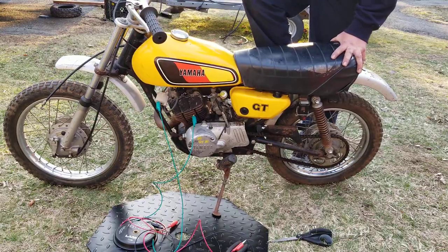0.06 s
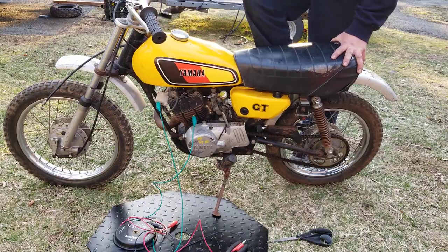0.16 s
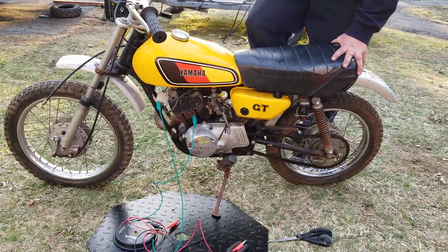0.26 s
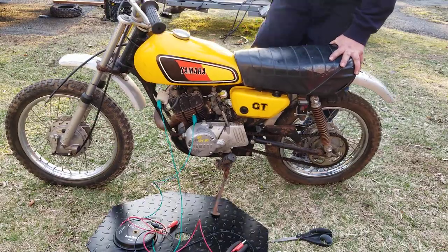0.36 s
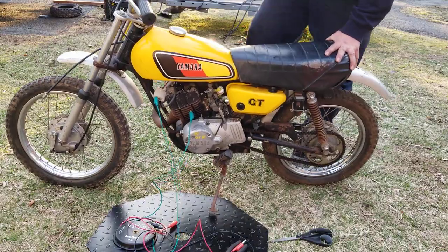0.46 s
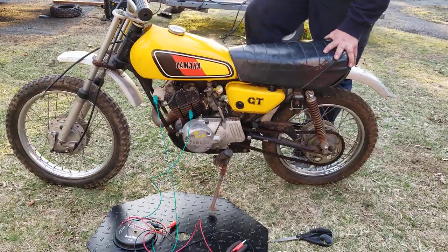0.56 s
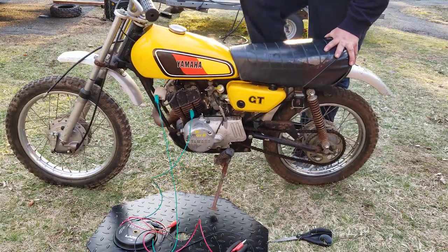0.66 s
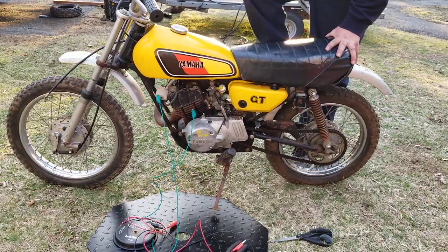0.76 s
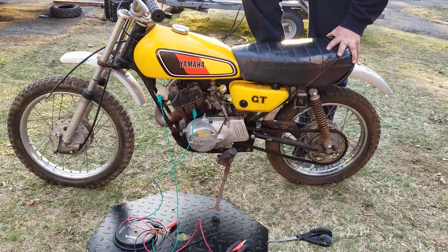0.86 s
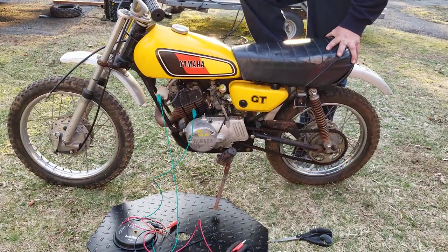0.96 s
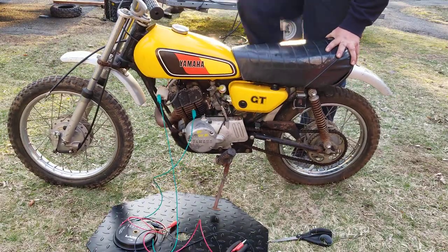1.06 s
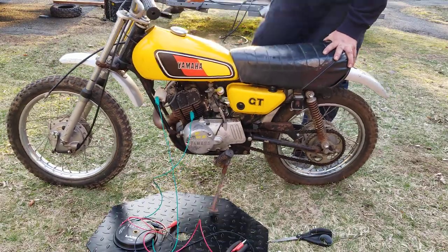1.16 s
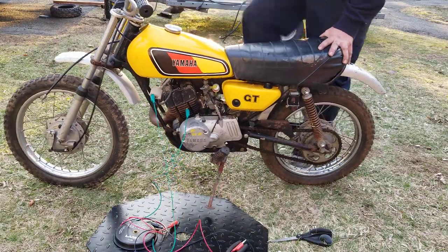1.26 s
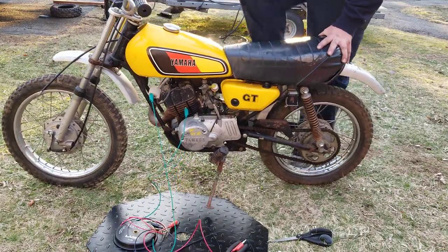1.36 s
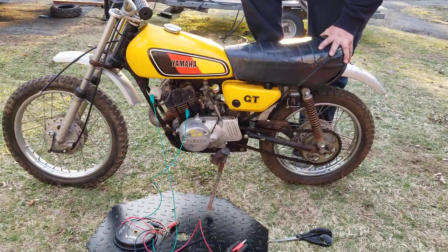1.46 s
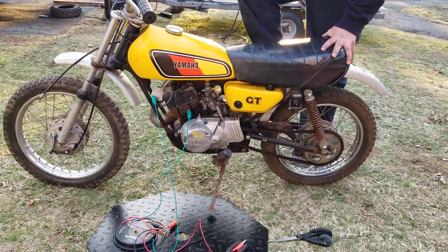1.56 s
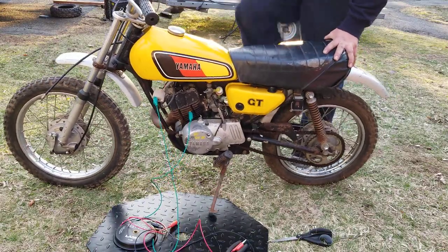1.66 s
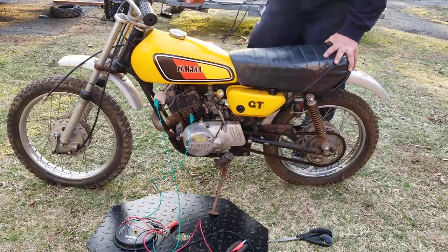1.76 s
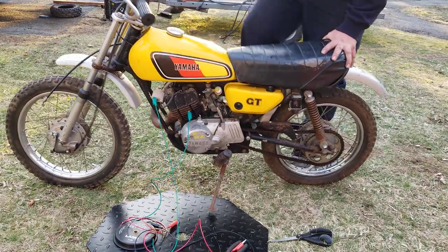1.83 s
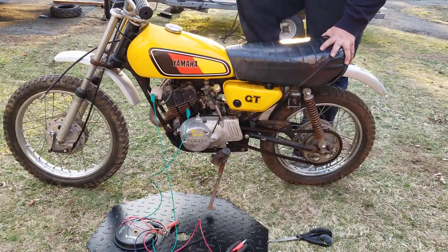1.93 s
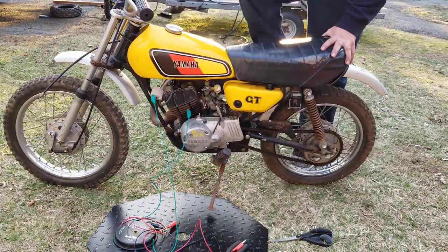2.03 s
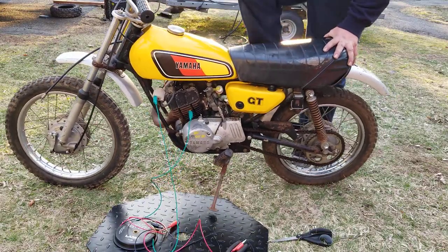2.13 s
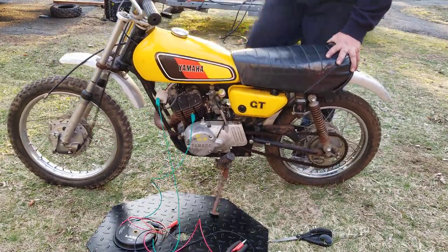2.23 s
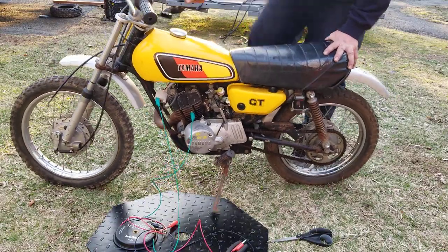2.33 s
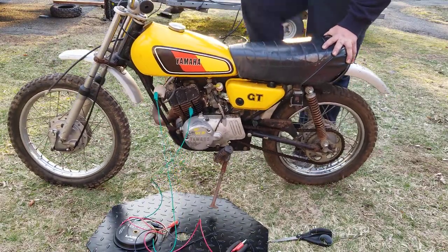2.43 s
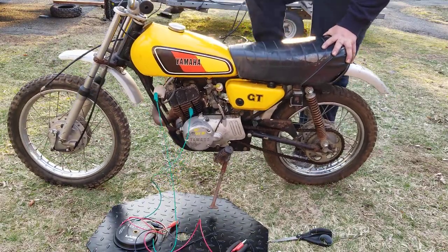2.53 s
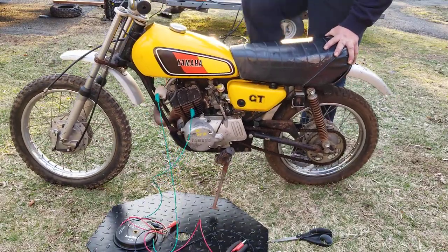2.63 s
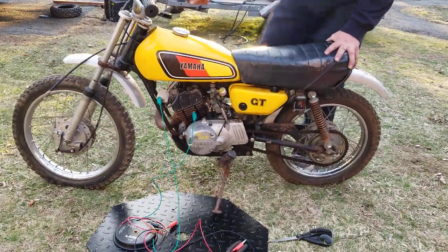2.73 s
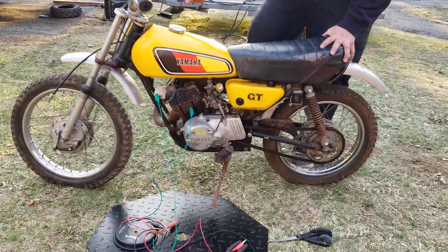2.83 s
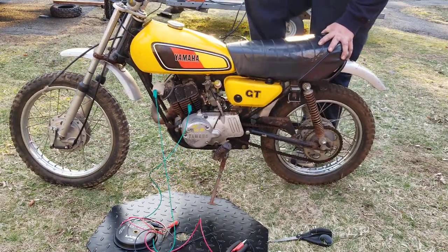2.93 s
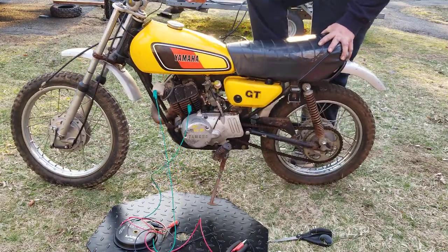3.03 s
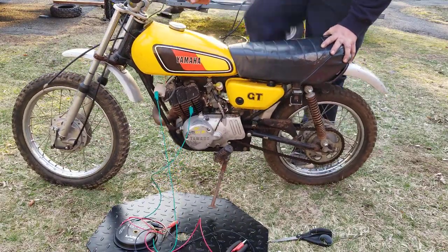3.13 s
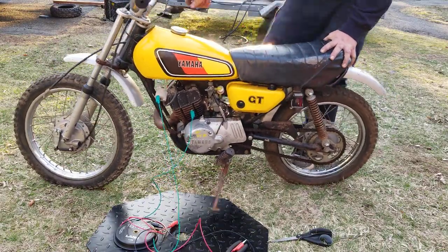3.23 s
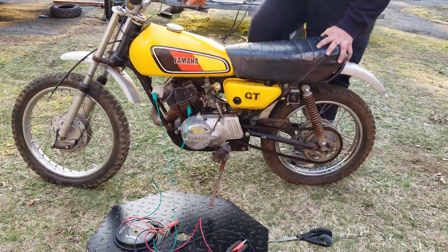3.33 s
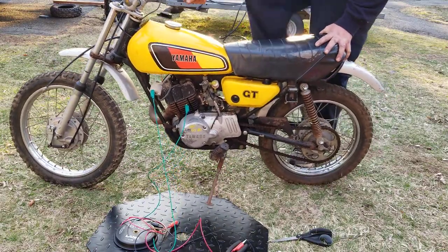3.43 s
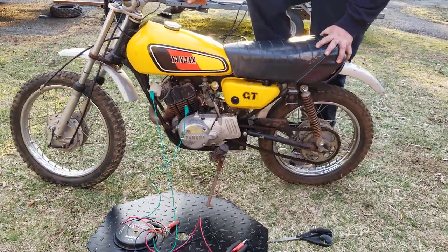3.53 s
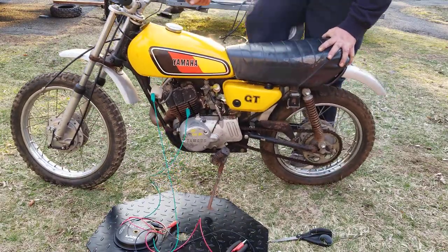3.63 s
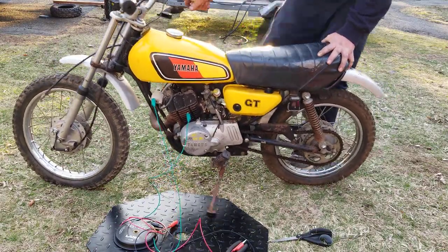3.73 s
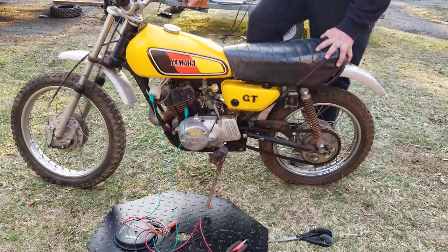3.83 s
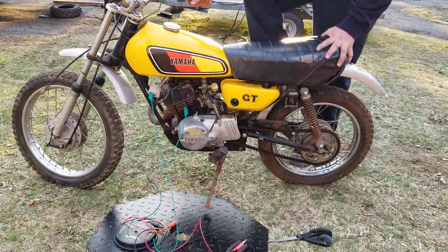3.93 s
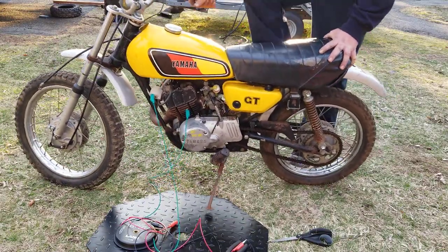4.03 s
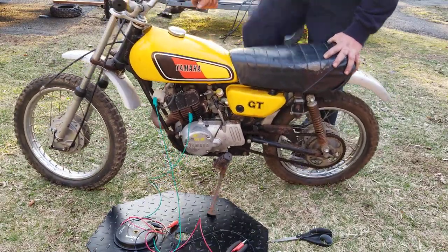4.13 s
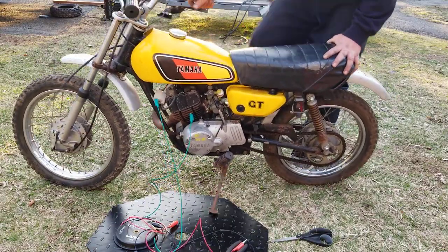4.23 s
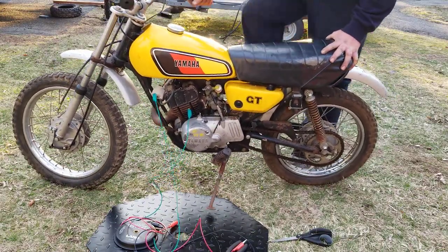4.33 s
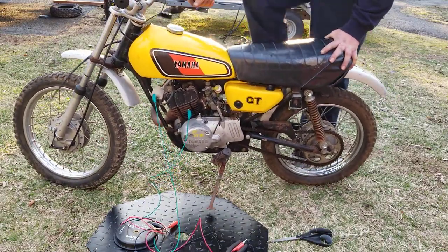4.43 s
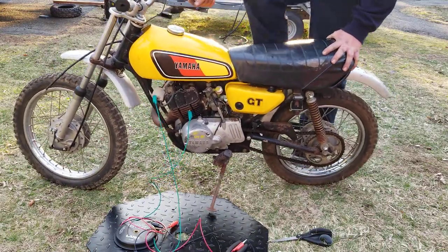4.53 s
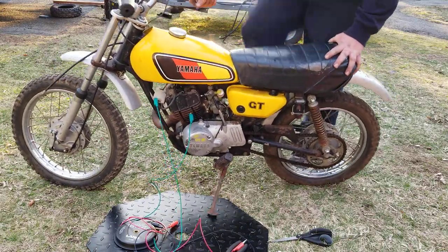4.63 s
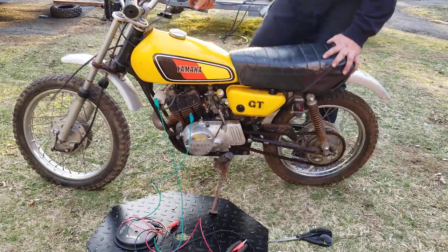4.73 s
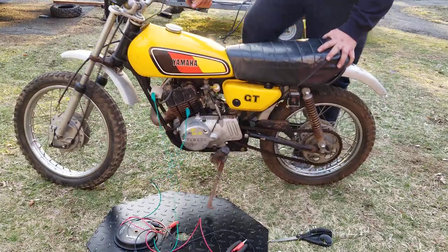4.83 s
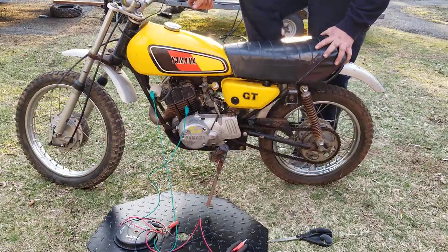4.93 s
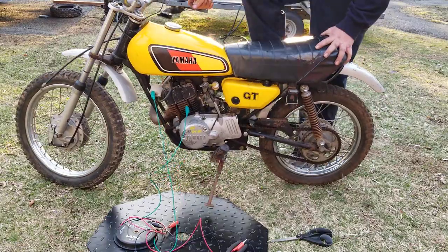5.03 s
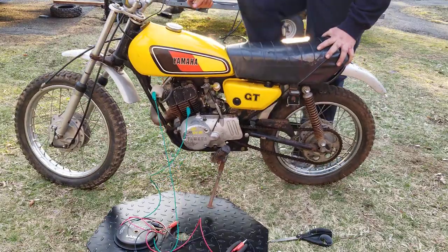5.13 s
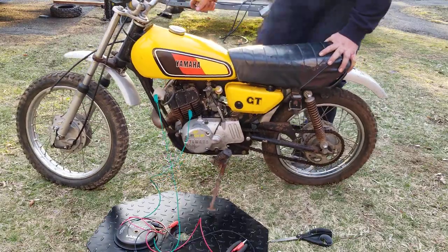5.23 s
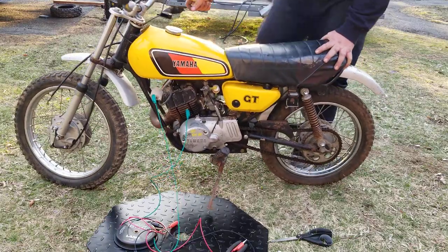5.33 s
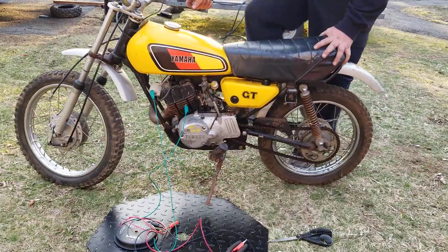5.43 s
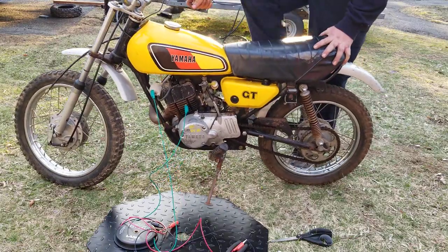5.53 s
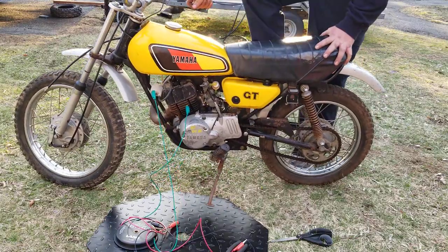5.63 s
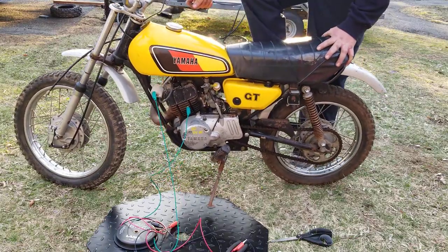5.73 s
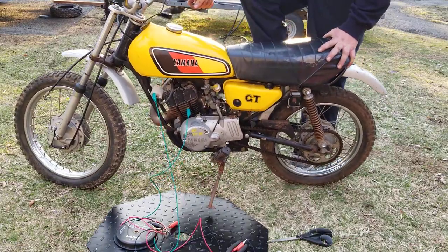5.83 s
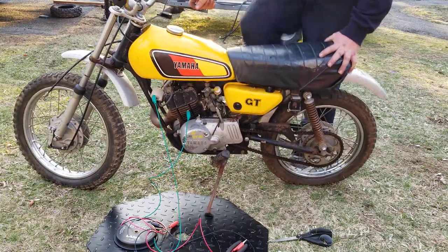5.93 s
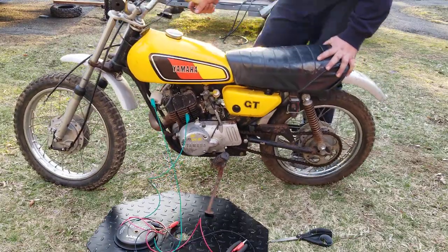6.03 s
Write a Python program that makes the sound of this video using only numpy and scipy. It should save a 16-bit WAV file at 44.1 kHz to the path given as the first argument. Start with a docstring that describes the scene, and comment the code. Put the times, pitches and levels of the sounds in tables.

```python
"""A small two-stroke motorbike is kicked over eleven times on a lawn and never fires.
Light wind and far traffic, as shaped noise, lie under it all; faint rustles and one soft tone fall in places.
In a typical kick the pawl clicks in and jolts the frame, exciting their modes, and the gears whirr.
Air squeezed out at compressions hisses as band-shaped noise; the pipe toots, its modes damped at port closing.
Then the lever clanks on its stop and ticks back, as short noise blows filtered by the modes of the case."""
import sys
import numpy as np
from scipy import signal
from scipy.fft import rfft, irfft, next_fast_len
from scipy.io import wavfile
from scipy.ndimage import uniform_filter1d

SR = 44100
rng = np.random.default_rng(int(sys.argv[2]) if len(sys.argv) > 2 else 0)


def generate_wav(signal):
    """Clip the signal to [-1, 1] and save it as 16-bit WAV at the path in sys.argv[1]."""
    frames = np.transpose(np.atleast_2d(signal))
    scaled = np.clip(frames, -1, 1) * 32767
    pcm = np.round(scaled).astype(np.int16)
    wavfile.write(sys.argv[1], SR, pcm)


N = 268569


def amp(db):
    """Level to amplitude: 20 dB for each factor of ten."""
    return 10 ** (np.asarray(db) / 20)


def evened(x):
    """Normalisation to unit root-mean-square value."""
    return x / np.sqrt(np.mean(x ** 2) + 1e-20)


def smoothed_twice(x, width):
    """Low-pass by two moving averages, width in samples."""
    return uniform_filter1d(uniform_filter1d(x, width), width)


def read(points, hz):
    """Spectrum table interpolated along logarithmic frequency."""
    f, value = np.transpose(points)
    return np.interp(np.log(hz + 1), np.log(f + 1), value)


def add(mix, s, sound):
    """Superposition: a sound is added in place, starting at s seconds."""
    part = mix[round(s * SR):][:len(sound)]
    part += sound[:len(part)]


def coloured(x, gain):
    """Linear filtering: the spectrum is multiplied by a gain given as a function of Hz."""
    size = next_fast_len(N)
    return irfft(rfft(x, size) * gain(np.fft.rfftfreq(size, 1 / SR)), size)[..., :N]


def humps(hz, peaks):
    """Resonance curves (f/Hz, width/Hz, level/dB) summed in power."""
    return np.sqrt(sum(amp(db) ** 2 / (1 + (2 * (hz - f) / w) ** 2) for f, w, db in peaks))


def swells(rows, sharp):
    """Amplitude envelope: smooth bumps from rows (middle t/s, level/dB, length/s)."""
    out = np.zeros(N)
    for s, level_db, length in rows:
        span = max(length, .004)
        add(out, s - span / 2, amp(level_db) * np.hanning(round(span * SR)) ** sharp)
    return out


# modes of engine case and frame: (f/Hz, level/dB, t60/s before hard blows shorten it)
CASE_MODES = [(660, -19, 0.33), (766, -14.5, 0.24), (920.6, -2.5, 0.13), (1209, 4, 0.088),
              (1470, -2, 0.025), (1778, -3, 0.019), (2058, -7.5, 0.11), (2424, -1, 0.03), (2710, -4, 0.078),
              (3182, -5, 0.015), (4130, -13, 0.046), (4510, -12.5, 0.054), (4527, -7, 0.031),
              (5220, -13.5, 0.027), (6540, -8.5, 0.0076)]
# the pawl bites as the lever goes down: (t/s, level/dB, low modes level/dB)
PAWL_BITES = [(1.0096, -20.5, 4.5), (1.6491, -27, -2), (2.1862, -18.5, -2), (2.6491, -23, -1),
              (3.1308, -23.5, 3.5), (3.6325, -18, -10), (4.119, -22.5, -1.5), (4.6116, -19, -7.5),
              (5.1454, -21.5, -3), (5.904, -26, 2.5)]
# the lever hits and bounces on its stop: (t/s, level/dB, low modes level/dB, bright tick level/dB)
LEVER_CLANKS = [(1.7853, -17.5, -6, -33), (2.2727, -16.5, -1, -15), (2.2922, -13.5, -0.5, -11.5),
                (3.2106, -37, -6, -10), (3.2435, -6.5, -8.5, -10), (3.7075, -41, -1.5, -4),
                (3.7334, -8, -2, -13), (4.1729, -10, -7.5, -9), (4.2138, -10, -2, -15.5),
                (4.6698, -18.5, 4.5, -15), (5.2704, -7.5, -0.3, -14), (6.0064, -37, -10, -11),
                (6.0352, -11, -3.5, -14)]
# thin knocks of gear slack in mid stroke: (t/s, level/dB)
GEAR_SLACK = [(1.1104, -22.5), (1.1882, -21), (1.724, -20.5), (1.7474, -27), (1.8084, -27), (2.2378, -24),
              (2.7307, -24), (2.7784, -22.5), (3.1023, -29)]
# bright ticks as the engine stalls and the lever springs back: (t/s, level/dB)
SPRING_TICKS = [(0.4404, -26.5), (1.8454, -30), (1.9849, -31), (2.5177, -35), (2.8335, -27.5),
                (2.9704, -36.5), (3.4434, -42), (3.7984, -28), (3.9554, -38.5), (4.3064, -30),
                (4.4553, -31), (4.8204, -27.5), (4.9684, -31), (5.047, -47), (5.2205, -22.5), (5.3454, -32),
                (5.4784, -42)]
# dull knocks of boot and lever: (t/s, level/dB, low modes level/dB)
BOOT_THUDS = [(0.3044, -23.5, -2.7), (0.4055, -26.5, -9), (0.5397, -45, 4), (1.0979, -26, -8),
              (2.138, -30.5, -12), (2.6189, -34, -28), (3.1862, -22, -7.5), (3.581, -35, -12),
              (3.8886, -30.5, 4.5), (4.037, -30.5, -15), (5.109, -38, -26), (5.125, -41, -17),
              (5.855, -44.5, -8)]
# what all blows of a kind share: the columns their rows lack,
# of (low modes level/dB, bright tick level/dB, high modes level/dB)
BITE, CLANK, THUD = (-19, 9.2), (3.7,), (-29, -12)
SLAP, TICK = (-30, -13, 1), (-14, -2.5, 5.7)


def knocks(blow_s=0.0057, detune=0.022, spread_db=3, dense_db=-2, dense_s=0.017, hard_db=.5, tick_s=0.0022):
    """Modal excitation: a rattling blow rings the case; where it lands sets low, middle and high shares."""
    out, t0 = np.zeros((2, N)), np.arange(4000) / SR
    hz, db, t60 = (c[:, None] for c in np.transpose(CASE_MODES))
    high = signal.butter(2, 6000, "high", fs=SR)
    f = np.fft.rfftfreq(len(t0), 1 / SR)
    kinds = [(PAWL_BITES, BITE), (LEVER_CLANKS, CLANK), (GEAR_SLACK, SLAP),
             (SPRING_TICKS, TICK), (BOOT_THUDS, THUD)]
    blows = [tuple(row) + shared for rows, shared in kinds for row in rows]
    for s, level_db, low_db, tick_db, high_db in blows:
        t = t0 * amp(hard_db * max(high_db, 0))  # hard bright clicks die faster
        share_db = np.where(hz < 1450, low_db, np.where(hz > 3000, high_db, 0))
        share_db = share_db + spread_db * rng.standard_normal(hz.shape)
        pitch = 1 + detune * rng.standard_normal(hz.shape)
        modes = amp(db + share_db - 60 * t / t60) * np.sin(2 * np.pi * hz * pitch * t0)
        blow, many, fizz = rng.standard_normal((3, len(t)))
        blow = blow * np.exp(-t / blow_s)
        rung = signal.fftconvolve(modes, blow[None], axes=1)[:, :len(t)]
        # the blow spreads each mode in time but leaves it its energy
        mode_size = np.linalg.norm(modes, axis=1, keepdims=True)
        rung_size = np.linalg.norm(rung, axis=1, keepdims=True)
        body = (rung * mode_size / rung_size).sum(0)
        # the countless small modes of fins, covers and bolts merge into a short burst: (f/Hz, level/dB)
        shape = [(100, low_db - 38), (300, low_db - 25), (600, low_db), (1200, low_db), (2200, 5.0),
                 (4500, high_db - 7.5), (6500, high_db - 24.0), (9000, -53.0)]
        dense = irfft(rfft(many) * amp(read(shape, f))) * np.exp(-t / dense_s)
        tick = signal.lfilter(*high, fizz) * t0 / tick_s * np.exp(1 - t0 / tick_s)
        sound = amp(-6) * body + amp(dense_db) * dense + amp(tick_db) * tick
        sound = amp(level_db) * sound * np.minimum(t / 0.0045, 1)
        start = s - .0012
        add(out[0], start, sound)
        # each knock reaches the right port slightly earlier or later, at random
        add(out[1], start + rng.uniform(-0.8, 1) * .00007, sound)
    return out


def jolts(level_db=-9, hz=270, decay_s=0.0022):
    """Impulse response: the frame gives one low push when the pawl takes the load."""
    out, t = np.zeros(N), np.arange(1000) / SR
    push = np.sin(2 * np.pi * hz * t) * t / decay_s * np.exp(1 - t / decay_s)
    for s, bite_db, _ in PAWL_BITES:
        add(out, s + .003, amp(bite_db + level_db) * push)
    return out


# air squeezed out at each compression: (middle t/s, level/dB)
COMPRESSION_HISSES = [(0.275, -47.5), (0.325, -46), (0.367, -32), (0.42, -41), (0.491, -48), (1.08, -31),
                      (1.148, -30.5), (1.247, -42), (1.711, -28.5), (1.766, -27.5), (1.839, -34),
                      (2.226, -32.5), (2.283, -29), (2.31, -40), (2.365, -33), (2.696, -28), (2.753, -27),
                      (2.824, -33), (3.174, -31), (3.229, -27.5), (3.303, -33), (3.672, -33.5), (3.73, -29),
                      (3.801, -37.5), (4.16, -28.5), (4.215, -32), (4.298, -34.5), (4.433, -54),
                      (4.658, -25.5), (4.72, -26), (4.806, -31), (4.946, -54), (5.198, -26), (5.255, -22.5),
                      (5.321, -29.5), (5.972, -26), (6.031, -22.5)]
# cavity resonances near the leak: (f/Hz, width/Hz, relative level/dB)
LEAK_RESONANCES = [(3160, 160, -0.5), (4400, 87, -88), (5260, 39, -11.5), (4880, 66, 0), (6043, 118, -3.5),
                   (8570, 320, -10), (11200, 390, -18), (13800, 880, -29)]
# broad spectrum of the leak: (f/Hz, relative level/dB)
LEAK_SPECTRUM = [(1200, -38), (2500, -15), (4500, -11), (9000, -54.5), (15500, -25)]
# s a -30 dB hiss lasts; s longer for each dB softer, as the crank slows
HISS_S, HISS_STRETCH = .021, .0005


def hisses():
    """Turbulent jet noise: air through a gap swells with the pressure, coloured by the cavities near it."""
    def leak_gain(hz):
        resonant = humps(hz, LEAK_RESONANCES) * np.minimum(hz / 2800, 1) ** 4
        return resonant + amp(read(LEAK_SPECTRUM, hz))

    air = coloured(rng.standard_normal(N), leak_gain)
    rows = [(s, db, HISS_S - HISS_STRETCH * (db + 30)) for s, db in COMPRESSION_HISSES]
    return swells(rows, sharp=0.34) * evened(air)


# the pipe rings while the exhaust port is open: (t/s, level/dB, open time/s)
PORT_TOOTS = [(0.341, -19, 0.015), (0.437, -25.5, 0.058), (1.123, -20, 0.014), (1.206, -20, 0.025),
              (1.743, -18.5, 0.0092), (1.81, -20, 0.011), (2.26, -17, 0.013), (2.332, -23.5, 0.054),
              (2.728, -17.5, 0.0084), (2.793, -22.5, 0.015), (3.206, -17, 0.011), (3.274, -24, 0.023),
              (3.675, -33, 0.049), (3.7, -28, 0.022), (3.774, -18.5, 0.01), (4.153, -23, 0.045),
              (4.195, -13, 0.0054), (4.263, -24, 0.029), (4.667, -14, 0.003), (4.727, -16.5, 0.011),
              (4.771, -27, 0.016), (4.818, -17.5, 0.0066), (5.208, -17.5, 0.0064), (5.263, -24.5, 0.031),
              (5.329, -12, 0.0058), (5.735, -40, 0.016), (5.905, -32, 0.015), (5.976, -21.5, 0.011),
              (6.024, -26, 0.018), (6.075, -51, 0.014)]
# modes of the exhaust pipe: (f/Hz before detuning, level/dB)
PIPE_MODES = [(390, -7), (470, -0.5), (590, -14.5), (820, -12.5)]
TOOT_DETUNE = .02  # standard deviation of the pipe pitch, as a share


def toots(t60=0.24, rise_s=0.005, spread_db=3, rough=0.3):
    """Air-column resonance: pipe modes swell with a turbulent puff and are damped once the port shuts."""
    out, t = np.zeros(N), np.arange(3000) / SR
    hz, db = (c[:, None] for c in np.transpose(PIPE_MODES))
    for s, level_db, opened in PORT_TOOTS:
        luck, pitch = rng.standard_normal((2,) + hz.shape)
        mode_db = db + spread_db * luck * (db < -5)  # only the weaker modes vary in level
        ring = amp(mode_db) * np.sin(2 * np.pi * hz * (1 + TOOT_DETUNE * pitch) * t)
        flutter = 1 + rough * evened(uniform_filter1d(rng.standard_normal(len(t)), 120))
        shut_db = -60 * np.maximum(t - opened, 0) / 0.029
        decay = amp(level_db - 60 * t / t60 + shut_db)
        add(out, s - .002, decay * ring.sum(0) * flutter * np.minimum(t / rise_s, 1))
    return out


# eleven kicks and one bounce of the lever:
# (start t/s, fastest t/s, gear rattle level/dB, frame rumble level/dB)
KICK_STROKES = [(0.257, 0.344, -39, -37), (0.944, 1.118, -37, -37.5), (1.645, 1.749, -35.5, -33.5),
                (2.134, 2.258, -32.5, -31), (2.591, 2.728, -33.5, -33), (3.075, 3.246, -38, -34),
                (3.58, 3.707, -35.5, -33.5), (3.89, 3.886, -47, -38.5), (4.041, 4.197, -36, -33),
                (4.56, 4.686, -33.5, -32), (5.109, 5.229, -35.5, -33), (5.91, 6.017, -34, -30)]
ONSET_S, RUNDOWN_S = .008, .17


def kick_gain(shape, column):
    """Speed envelope: each kick jumps in, climbs to its fastest moment, runs down and settles."""
    start_db, fall, settle = shape
    t, out = np.arange(N) / SR, np.zeros(N)
    for row in KICK_STROKES:
        start, fastest = row[:2]
        climb_db = np.interp(t, [start - ONSET_S, start, fastest], [-80, start_db, 0])
        since = np.maximum(t - fastest, 0)
        fall_db = -fall * np.minimum(since, RUNDOWN_S) - settle * np.maximum(since - RUNDOWN_S, 0)
        out += amp(row[column] + climb_db + fall_db)
    return out


# resonances of the frame: (f/Hz, width/Hz, relative level/dB)
FRAME_RESONANCES = [(219, 40, -12), (380, 49, -6.5), (445.4, 45, 3.5), (574, 11, 2.5), (826, 200, -1.5)]
# one kick: (start level/dB re top, fall in the rundown/dB per s, fall after it/dB per s)
RATTLE_SHAPE, RUMBLE_SHAPE = (-17.5, 118, 43.6), (-23, 71.5, 108)


def turning(teeth_per_s=3000, size_db=2.0, wide_db=-34, clump_db=2.5, patchy_db=4):
    """Random impact excitation: gear teeth and sliding lever whirr through the case; the frame rumbles."""
    clumps = amp(clump_db * evened(smoothed_twice(rng.standard_normal(N), 400)))
    sizes = amp(size_db * np.minimum(rng.exponential(1, N), 4))
    taps = sizes * rng.choice([-1, 1], N) * (rng.random(N) < teeth_per_s / SR)
    case = [(f, 6 / t60, db) for f, db, t60 in CASE_MODES if f > 1000]

    def case_gain(hz):
        return humps(hz, case) * np.minimum(hz / 1200, 1) ** 2 / (1 + (hz / 5300) ** 8) + amp(wide_db)

    def frame_gain(hz):
        return humps(hz, FRAME_RESONANCES) * np.minimum(hz / 200, 1) ** 2 / (1 + (hz / 1500) ** 2)

    rattle = coloured(taps, case_gain)
    # different parts ring in turn: patches about 500 Hz by 20 ms
    z = signal.stft(rattle, nperseg=256, noverlap=192)[2]
    patches = uniform_filter1d(rng.standard_normal(z.shape), size=3, axis=0)
    patches = uniform_filter1d(patches, size=14, axis=1)
    rattle = signal.istft(z * amp(patchy_db * evened(patches)), nperseg=256, noverlap=192)[1][:N]
    rumble = coloured(rng.standard_normal(N), frame_gain)
    gears = kick_gain(RATTLE_SHAPE, column=2) * evened(rattle)
    frame = kick_gain(RUMBLE_SHAPE, column=3) * evened(rumble)
    return clumps * (gears + frame)


def reflections(x, t60=0.12, lowest_hz=700):
    """Diffuse scattering: ground and things nearby throw back a short tail, different at each port."""
    t = np.arange(6000) / SR
    taps = rng.standard_normal((2, len(t))) * amp(-60 * t / t60) * np.minimum(t / 0.002, 1)
    taps = signal.lfilter(*signal.butter(1, lowest_hz, "high", fs=SR), taps)
    return signal.fftconvolve(x, taps / np.linalg.norm(taps[0]), axes=1)[:, :N]


# faint dry rustles: (middle t/s, level/dB, length/s)
FAINT_RUSTLES = [(.17, -55, 0.012), (.79, -58, 0.039), (1.38, -51.5, 0.087), (3.02, -53, 0.016),
                 (3.5, -61, 0.023), (4.5, -59, .02)]
# a soft short tone between the first kicks: (t/s, level/dB, f/Hz, length/s)
SOFT_TONE = (.776, -43, 645, .032)


def small_sounds():
    """Band-shaped noise and a windowed sine: faint rustles around 4 kHz and one soft tone."""
    resonances = [(4300, 2700, 1.5), (2380, 990, 1.5)]
    rustle = coloured(rng.standard_normal((2, N)), lambda hz: humps(hz, resonances) ** 2)
    out = swells(FAINT_RUSTLES, sharp=0.46) * evened(rustle)
    s, level_db, hz, length = SOFT_TONE
    t = np.arange(round(length * SR)) / SR
    tone = np.zeros(N)
    add(tone, s, amp(level_db) * np.sin(2 * np.pi * hz * t) * np.hanning(len(t)) ** .5)
    return out + tone


# course of the wind: (t/s, level/dB)
WIND_GUSTS = [(0.0, -45.5), (0.61, -42.5), (2.31, -44.5), (2.42, -49), (5.02, -47), (5.85, -39),
              (6.09, -40)]
# spectral density of the wind: (f/Hz, relative level/dB per Hz)
WIND_SPECTRUM = [(20, -12), (30, -8), (65, 3.5), (108, -1), (200, -13), (350, -14.5), (600, -72)]


def wind(lumps_db=5.0, alike=0.038):
    """Partial coherence: low lumpy buffeting is mostly unrelated at the two ports."""
    left, other, lumps = rng.standard_normal((3, N))
    pair = np.array([left, alike * left + np.sqrt(1 - alike ** 2) * other])
    pair = evened(coloured(pair, lambda hz: amp(read(WIND_SPECTRUM, hz))))
    lumps = evened(smoothed_twice(lumps, 1500))
    gust_s, gust_db = np.transpose(WIND_GUSTS)
    level_db = np.interp(np.arange(N) / SR, gust_s, gust_db)
    return amp(level_db + lumps_db * lumps) * pair * amp([[-1.5], [1.5]])  # right port louder


# spectral density of the background: (f/Hz, relative level/dB per Hz)
YARD_SPECTRUM = [(150, 1.5), (250, 5), (800, 4.5), (2250, -11.5), (3700, -22.5), (9100, -30.5),
                 (15500, -21)]
YARD_DB = -50


def yard():
    """Stationary shaped noise: far traffic, leaves and microphone hiss."""
    noise = coloured(rng.standard_normal((2, N)), lambda hz: amp(read(YARD_SPECTRUM, hz)))
    return amp(YARD_DB) * evened(noise)


# phase between the ports: (f/Hz, lead of the left/rad)
PORT_PHASE = [(300, 0), (1000, -.3), (1900, .4), (3200, -1.2), (4700, -.8), (8000, -1.5), (15000, -1.5)]
# level between the ports: (f/Hz, left minus right level/dB)
PORT_LEVEL = [(300, -.5), (1300, -0.5), (2400, 3.5), (4400, -.5), (8000, -3), (15000, 1)]


def scene():
    """Interchannel differences: the bike at two microphone ports, added to wind and yard."""
    bike = knocks() + jolts() + hisses() + toots() + turning()
    side = np.array([[.5], [-.5]])  # left and right each take half the difference

    def port_gain(hz):
        level = amp(side * read(PORT_LEVEL, hz))
        phase = np.exp(1j * side * read(PORT_PHASE, hz))
        return level * phase / (1 + (160 / (hz + 1)) ** 4)  # the lows below about 160 Hz fall away

    ports = coloured(bike, port_gain)
    return ports + amp(-9) * reflections(bike) + small_sounds() + wind() + yard()


EDGE_HZ = 15750


def record(dry):
    """Band limitation: a linear-phase low-pass filter removes the highest treble."""
    taps = signal.firwin(511, EDGE_HZ, window=("kaiser", 9), fs=SR)
    return signal.oaconvolve(dry, taps[None], "same")


dry = scene()
out = record(dry)
generate_wav(out)
```